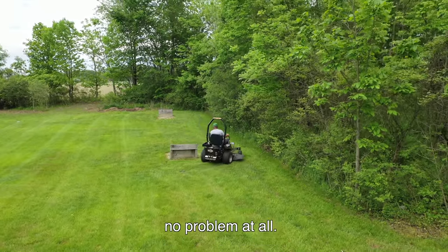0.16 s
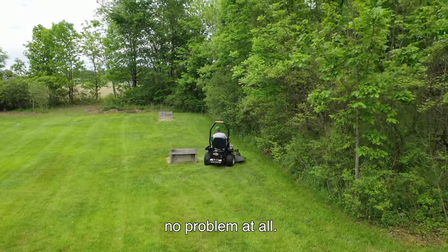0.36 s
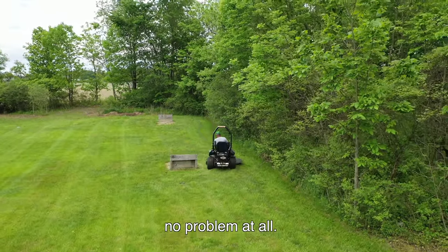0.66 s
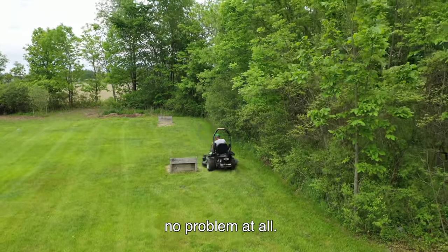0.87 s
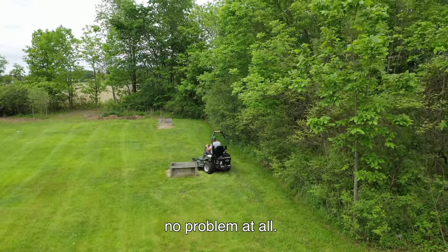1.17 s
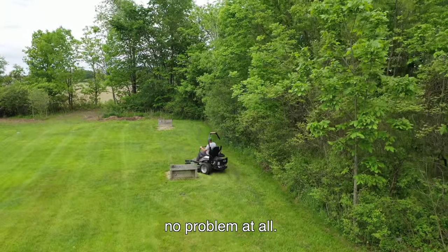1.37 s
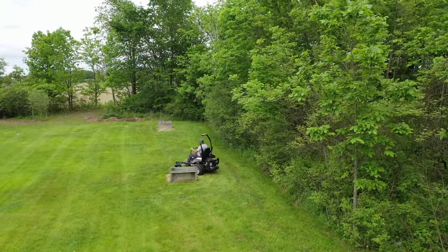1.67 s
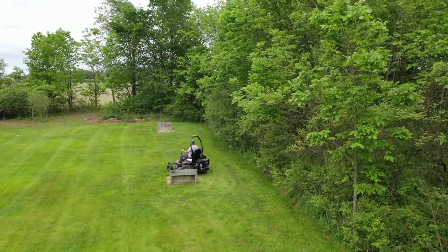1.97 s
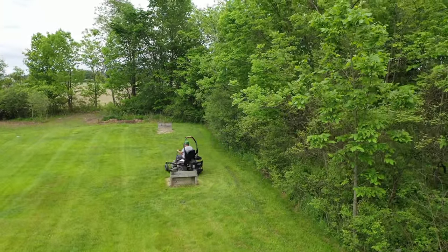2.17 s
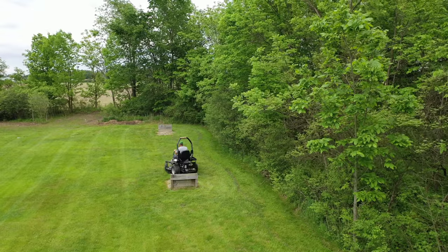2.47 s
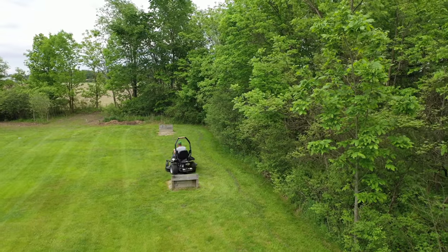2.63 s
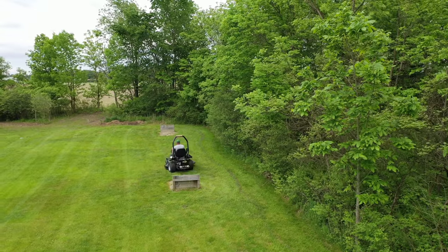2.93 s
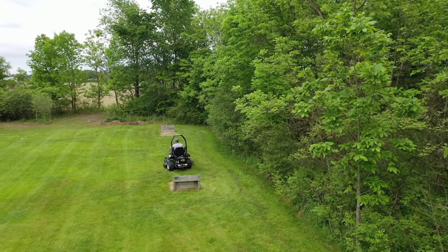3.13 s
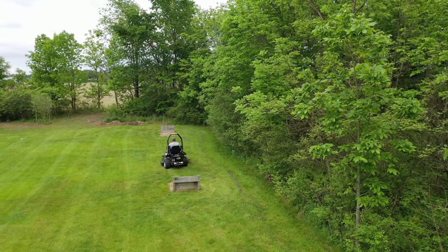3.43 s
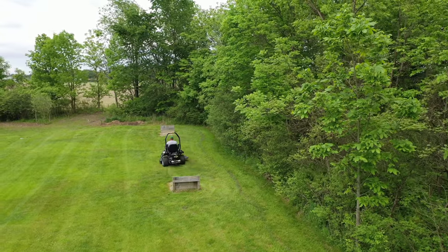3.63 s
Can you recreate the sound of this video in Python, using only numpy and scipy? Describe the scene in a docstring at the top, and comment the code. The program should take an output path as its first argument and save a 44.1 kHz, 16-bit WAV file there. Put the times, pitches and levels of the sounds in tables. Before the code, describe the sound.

Ride-on lawn mower at mowing speed, deep blade drone and airy rush, with one short dropout.

```python
"""A steady low drone with an airy rush, an exhaust throb and faint whines: a ride-on mower at mowing speed.
It turns on an open lawn, so the tones shift in level; the sound cuts out for 0.28 s and comes straight back.
Blade, exhaust and engine tones are sines locked to one governed speed through the belt ratio.
Rush, roar and bumps are filtered noise, clatter is tapped metal, whines are blurred sines."""
import sys
import numpy as np
from scipy import signal
from scipy.fft import rfft, irfft
from scipy.io import wavfile
from scipy.ndimage import uniform_filter1d

SR = 44100
rng = np.random.default_rng(int(sys.argv[2]) if len(sys.argv) > 2 else 0)


def wav_out(sig):
    """Save sig, one row per channel (or a flat mono array), as 16-bit PCM at SR to the path in sys.argv[1]."""
    wavfile.write(sys.argv[1], SR, np.round(np.clip(np.atleast_2d(sig).T, -1, 1) * 32767).astype(np.int16))


N = 167580
TIME = np.arange(N) / SR

# swell of the rush, followed by other layers: t/s, body level/dB, treble level/dB, hiss level/dB
SWELL = [(0, -1.5, -2, -0.5), (.33, -2, -3.5, 0), (.6, -0.5, 1, 1.5), (.9, -1, 0, 4), (1.17, 4.5, 1.5, 3.5),
         (1.38, 0.5, 1.5, 4.5), (1.55, 0, -1, -2.5), (1.85, -1.5, 0.5, -2.5), (2.2, -1, -2, -1.5),
         (2.45, -.5, 1, -1), (2.62, -3, -2, -2.5), (2.92, -0.5, .5, 0.5), (3.2, 0, 2, 0),
         (3.27, -1.5, 0.5, -1), (3.55, 1.5, .5, -0.5), (3.68, 3, -.5, -2.5), (3.8, 3.5, 2, 2.5)]
FLUTTER_HZ = 90.0  # bandwidth of the fast fluctuations


def amp(db):
    """Decibels to gain."""
    return 10 ** (np.asarray(db) / 20)


def unit(x):
    """Scales to rms 1."""
    return x / np.sqrt(np.mean(x ** 2) + 1e-20)


def curves(table):
    """Each column of a time table, joined by straight lines."""
    t_s, *columns = np.transpose(table)
    return [np.interp(TIME, t_s, column) for column in columns]


def colour(x, spectrum):
    """Filters x by a table of f/Hz, gain/dB, interpolated over log frequency."""
    f_hz, gain_db = np.transpose(spectrum)
    bins_hz = np.fft.rfftfreq(N, 1 / SR)
    response_db = np.interp(np.log(bins_hz + 1), np.log(f_hz), gain_db)
    return irfft(rfft(x) * amp(response_db), N)


def below(x, hz):
    """Zero-phase low-pass: gain one half at hz, 24 dB per octave above."""
    bins_hz = np.fft.rfftfreq(N, 1 / SR)
    return irfft(rfft(x) / (1 + (bins_hz / hz) ** 4), N)


def drift(hz):
    """Random fluctuation of rms 1, up to about hz."""
    x = below(rng.standard_normal(N), hz)
    return unit(x - x.mean())


def tone(turns, db):
    """A sine that follows turns, at an rms level, from a random phase."""
    return np.sqrt(2) * amp(db) * np.sin(2 * np.pi * (turns + rng.random()))


def bumps():
    """Soft low bumps: noise of a low rumbling spectrum under short Gaussian envelopes."""
    # bumps: centre t/s, full width at 1/e/s, level/dB
    bump_times = [(2.055, .05, -24), (2.31, .045, -24.5), (2.592, 0.039, -25)]
    # spectrum of the rumble: f/Hz, relative density/dB
    rumble_spectrum = [(20, -29), (40, -16), (70, -4), (95, 4), (130, -4.5), (250, -26), (1000, -72)]
    level = sum(amp(db) * np.exp(-(2 * (TIME - t_s) / width_s) ** 2) for t_s, width_s, db in bump_times)
    return level * unit(colour(rng.standard_normal(N), rumble_spectrum))


def whines(speed):
    """Thin machine whines that follow the speed, blurred by frequency jitter."""
    # whines: f at mean speed/Hz, mean level/dB
    whine_tones = [(2842, -54.5), (4716, -63.5), (5028, -63), (5356, -65.5), (6300, -65), (9695, -73),
                   (11160, -71), (12350, -73), (13824, -71.5)]
    waver_db, waver_hz, blur_hz = 3.0, 10.0, 9.0
    out = 0
    for hz, db in whine_tones:
        f_hz = hz * speed / speed.mean() + blur_hz * drift(FLUTTER_HZ)
        out = out + tone(np.cumsum(f_hz) / SR, db + waver_db * drift(waver_hz))
    return out


def clatter(crank):
    """Valve gear and deck metal: uneven taps, two per crank turn, excite decaying modes."""
    # modes of the metal: f/Hz, relative level/dB, t60/s
    modes = [(900, -0.5, 0.047), (1620, -1.5, .015), (1937, 3, .018), (2620, -5.5, 0.0063),
             (2896, -8.5, .02), (4120, -6, 0.0085)]
    level_db, spread_db = -36, 3.5
    taps = np.diff(np.floor(2 * crank), prepend=0)
    t = TIME[:SR // 20]
    out = 0
    for hz, db, t60_s in modes:
        ring = amp(db - 60 * t / t60_s) * np.sin(2 * np.pi * hz * t)
        out = out + signal.oaconvolve(taps * rng.standard_normal(N), ring)[:N]
    treble_db = curves(SWELL)[1]
    return amp(level_db + treble_db) * unit(out * amp(spread_db * drift(FLUTTER_HZ)))


def roar():
    """A dull roar of air from the deck, strongest partway through the turn: filtered noise."""
    # spectrum of the roar: f/Hz, relative density/dB
    roar_spectrum = [(50, -32.5), (130, -4.5), (200, 0), (320, 3), (560, -6), (750, -10.5), (1500, -34.5),
                     (4000, -68)]
    # roar over time: t/s, level/dB
    roar_level = [(0, -39), (.45, -36), (.7, -18.5), (.95, -23.5), (1.2, -21.5), (1.45, -20), (1.7, -29),
                  (2.1, -27.5), (2.6, -31.5), (3.2, -43), (3.8, -27)]
    return amp(curves(roar_level)[0]) * unit(colour(rng.standard_normal(N), roar_spectrum))


def turbulence():
    """White noise with random patches of level over time and frequency."""
    patch_db = 1.6
    z = signal.stft(rng.standard_normal(N), nperseg=256)[2]
    patches = uniform_filter1d(rng.standard_normal(z.shape), size=5, axis=0)  # over frequency
    patches = unit(uniform_filter1d(patches, size=8, axis=1))  # over time
    return signal.istft(z * amp(patch_db * patches))[1][:N]


def rush(turns):
    """Turbulent air under the deck, chopped by two blade tips per turn; three bands swell separately."""
    # spectrum of the rush: f/Hz, relative density/dB
    rush_spectrum = [(25, -35), (45, -32), (80, -22), (125, 0), (200, -1), (310, -1.5), (420, -4.5),
                     (540, -2), (690, -4.5), (880, -3.5), (1300, -9), (1700, -11), (1950, -13),
                     (2250, -15.5), (3300, -22.5), (4100, -25), (5200, -29.5), (8000, -34.5), (12000, -41),
                     (15500, -49.5)]
    level_db, flutter_db = -22.5, 0.6
    chop_depth, chop_hz = 0.34, 900  # chopping fades above chop_hz
    treble_hz, hiss_hz = 1305, 6540  # crossovers: body to treble, treble to hiss
    air = turbulence()
    air = air + chop_depth * np.cos(2 * np.pi * 2 * turns) * below(air, chop_hz)
    air = unit(colour(air * amp(flutter_db * drift(FLUTTER_HZ)), rush_spectrum))
    body = below(air, treble_hz)
    hiss = air - below(air, hiss_hz)
    treble = air - body - hiss
    body_db, treble_db, hiss_db = curves(SWELL)
    return amp(level_db) * (body * amp(body_db) + treble * amp(treble_db) + hiss * amp(hiss_db))


def buzz(crank, first=30, count=110):
    """A dense, uneven row of high half orders from the engine block, swelling with the treble."""
    level_db, slope_db_per_octave, spread_db = -50.0, -10, 4.5
    multiples = np.arange(first, first + count)
    levels_db = level_db + slope_db_per_octave * np.log2(multiples / first)
    levels_db = levels_db + spread_db * rng.uniform(-1.6, 1.84, count)
    row = sum(tone(k * crank / 2, db) for k, db in zip(multiples, levels_db))
    return amp(curves(SWELL)[1]) * row


def exhaust(crank):
    """Uneven firing repeats every two crank turns: a stack of half orders, fainter as the mower turns."""
    # exhaust tones: multiple of the four-stroke cycle rate, level at mid-time/dB
    exhaust_tones = [(2, -41), (3, -36.5), (4, -53), (5, -30.5), (6, -32.5), (7, -38), (8, -36), (9, -49),
                     (10, -31), (11, -33), (13, -35.5), (14, -42), (15, -44.5), (17, -41.5), (18, -47),
                     (19, -38.5), (22, -39), (28, -43.5), (29, -45.5)]
    waver_db, waver_hz, fade_db_per_s = 0.5, 6, 1.0
    stack = sum(tone(k * crank / 2, db + waver_db * drift(waver_hz)) for k, db in exhaust_tones)
    return stack * amp(-fade_db_per_s * (TIME - TIME.mean()))


def blades(turns):
    """Blade tips push out pressure pulses: three strong low tones, a deck howl and wavering upper tones."""
    # low tones as the deck swings: t/s, 2nd multiple level/dB, 3rd level/dB, 4th level/dB
    drone_levels = [(0, -10.5, -36, -26.5), (.55, -14.3, -30.5, -22), (1.1, -16.5, -29, -30),
                    (1.35, -16, -34.5, -26.5), (1.75, -13.5, -21.5, -19.5), (2.1, -15, -23.5, -23.5),
                    (2.52, -13.5, -19, -31.5), (2.62, -18, -26.5, -30), (2.92, -14, -18.5, -24.5),
                    (3.15, -16.5, -17, -23.5), (3.5, -19.5, -22.5, -20.5), (3.8, -26, -19, -20.5)]
    # upper tones: multiple of blade speed, level before swell/dB
    upper_tones = [(5, -31.5), (6, -31.5), (7, -36), (9, -39), (10, -43.5), (12, -36.5), (13, -40.5),
                   (14, -40), (15, -49), (16, -43)]
    # howl of the deck, 8th multiple: t/s, level/dB
    howl_level = [(0, -35.5), (.48, -25.5), (.7, -31.5), (.92, -24.5), (1.18, -20.5), (1.52, -32.5),
                  (1.9, -40), (2.38, -30), (2.6, -42), (3.05, -27), (3.28, -33.5), (3.56, -23),
                  (3.8, -34.5)]
    slip_turns, slip_hz = .004, 14.0  # belt unsteadiness
    low_waver_db, upper_waver_db, waver_hz = .5, 2.0, 5.0
    turns = turns + slip_turns * drift(slip_hz)
    swell_db = .9 * curves(SWELL)[0]  # upper tones follow most of the body swell
    low = 0
    for k, db in enumerate(curves(drone_levels), 2):
        wave = np.cos if k % 2 else np.sin
        level = np.sqrt(2) * amp(db + low_waver_db * drift(waver_hz))
        low = low + level * wave(2 * np.pi * k * turns)
    upper = sum(tone(k * turns, db + swell_db + upper_waver_db * drift(waver_hz)) for k, db in upper_tones)
    howl = tone(8 * turns, curves(howl_level)[0])
    return low + upper + howl


def scene():
    """One speed drives the blades and, through the belt ratio, the engine."""
    # blade speed, hunting a little under the governor: t/s, speed/turns per s
    blade_speed = [(0, 66.37), (0.22, 66.24), (0.5, 66.85), (0.76, 66.17), (1.0, 66.95), (1.22, 66.07),
                   (1.5, 65.87), (1.8, 66.68), (2.05, 66.48), (2.33, 66.4), (2.53, 66.84), (3.28, 66.75),
                   (3.52, 66.0), (3.8, 66.74)]
    belt_ratio = 1.1584  # blade turns per crank turn
    speed = curves(blade_speed)[0]
    turns = np.cumsum(speed) / SR
    crank = turns / belt_ratio
    air = roar() + rush(turns)
    engine = clatter(crank) + buzz(crank) + exhaust(crank)
    return (bumps() + whines(speed) + air + engine + blades(turns))[None]


def record(dry):
    """Silences the dropout with soft edges, also at both ends, then applies low cut and band limit."""
    drop_start_s, drop_end_s, edge_s = 2.630, 2.909, .003
    low_cut_hz, band_limit_hz = 48.0, 15700
    from_dropout_s = np.maximum(drop_start_s - TIME, TIME - drop_end_s)  # negative inside it
    from_ends_s = np.minimum(TIME, TIME[::-1])
    inside_s = np.minimum(from_dropout_s, from_ends_s)
    live = np.sin(np.pi / 2 * np.clip(inside_s / edge_s, 0, 1)) ** 2
    high_pass = signal.butter(2, low_cut_hz / (SR / 2), "high", output="sos")
    cut = signal.sosfilt(high_pass, dry * live)
    low_pass = signal.firwin(1023, band_limit_hz, window=("kaiser", 9), fs=SR)
    return signal.oaconvolve(cut, low_pass[None], "same")


dry = scene()
out = record(dry)
wav_out(out)
```